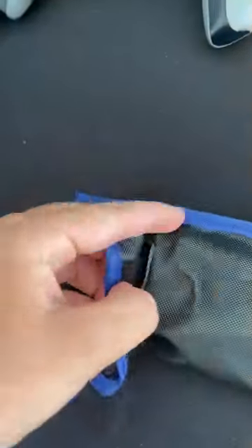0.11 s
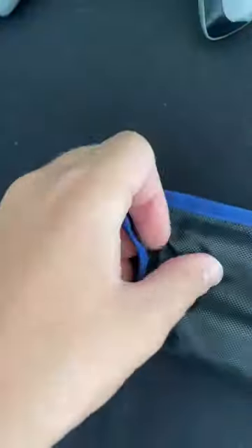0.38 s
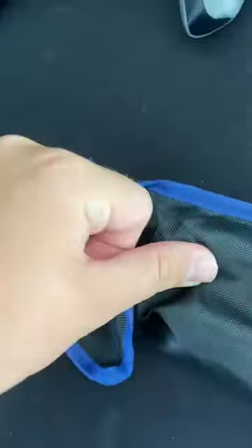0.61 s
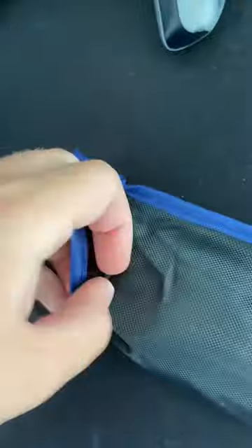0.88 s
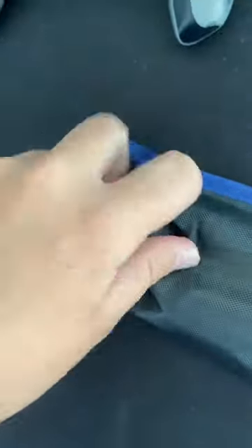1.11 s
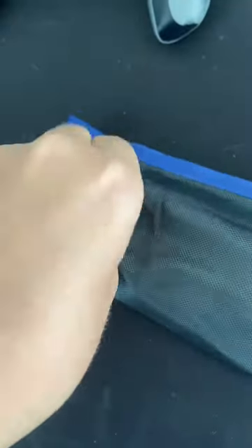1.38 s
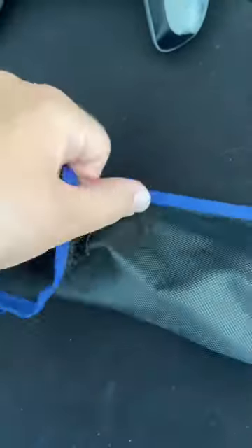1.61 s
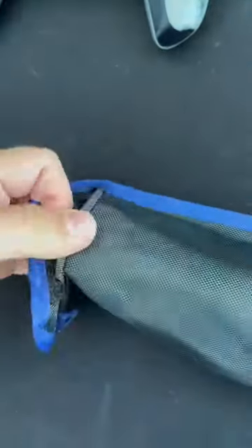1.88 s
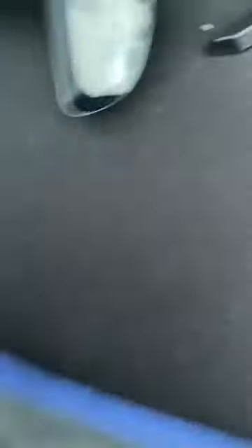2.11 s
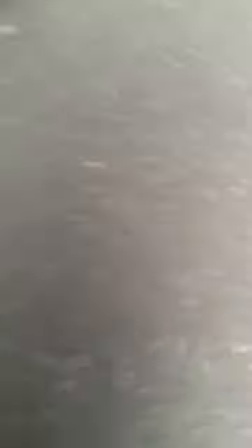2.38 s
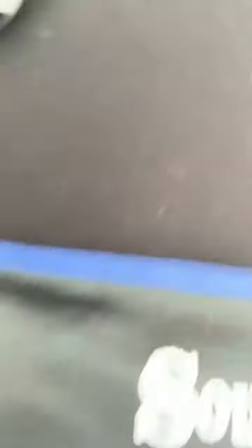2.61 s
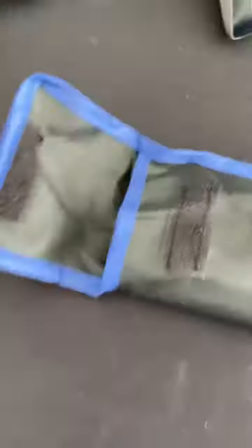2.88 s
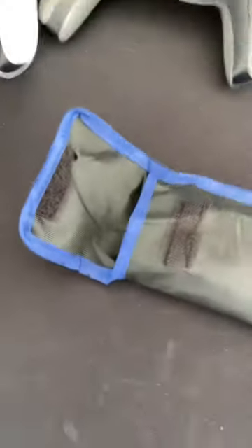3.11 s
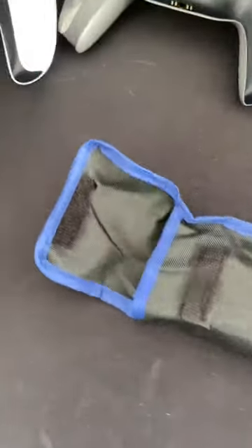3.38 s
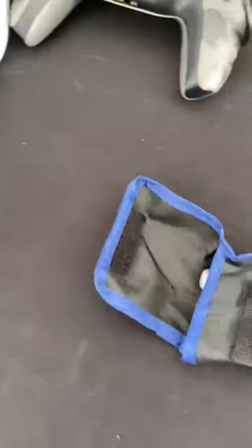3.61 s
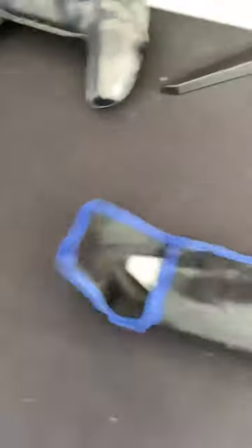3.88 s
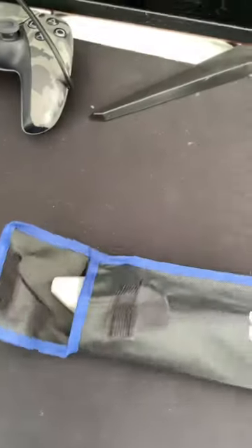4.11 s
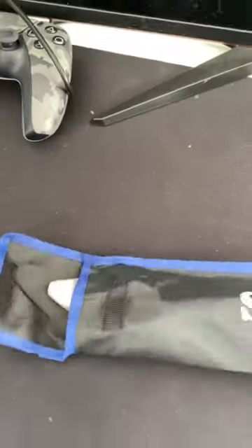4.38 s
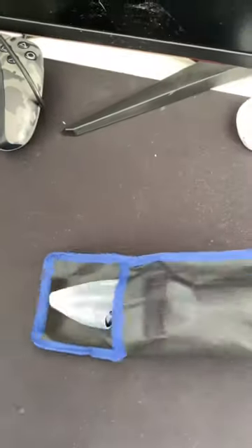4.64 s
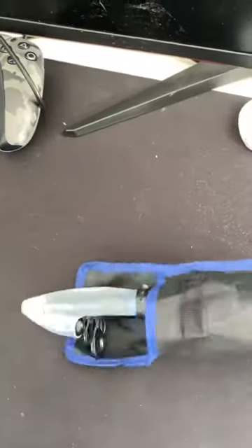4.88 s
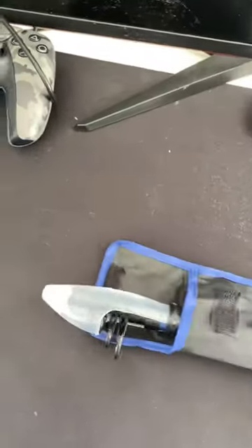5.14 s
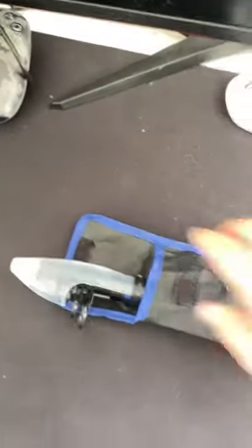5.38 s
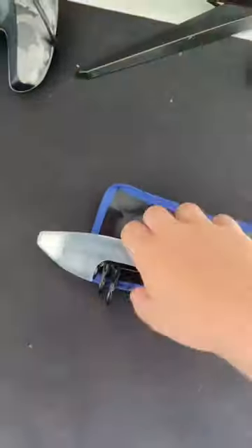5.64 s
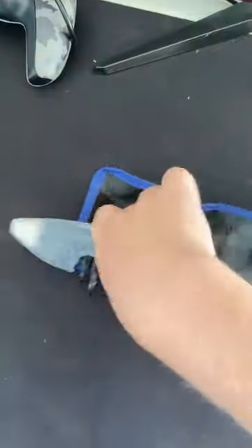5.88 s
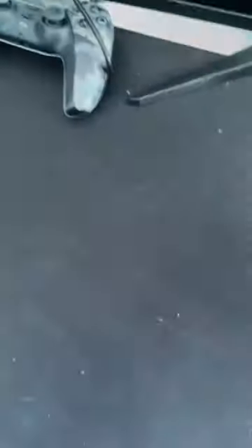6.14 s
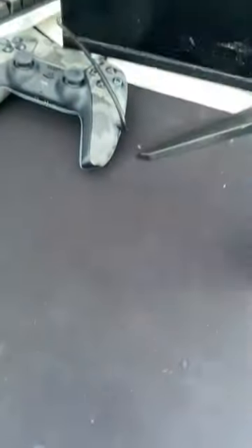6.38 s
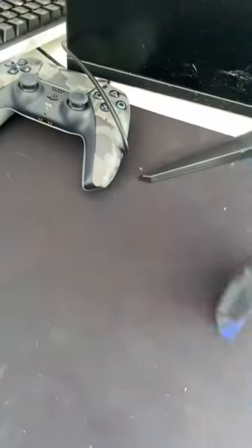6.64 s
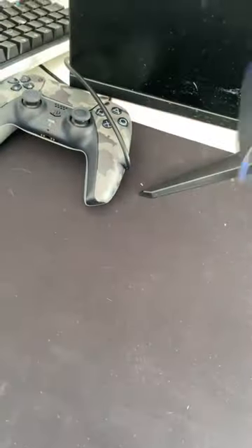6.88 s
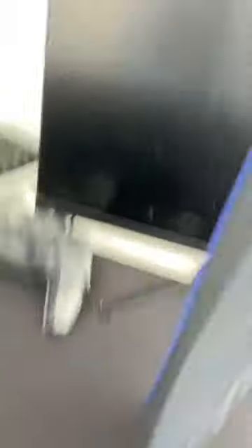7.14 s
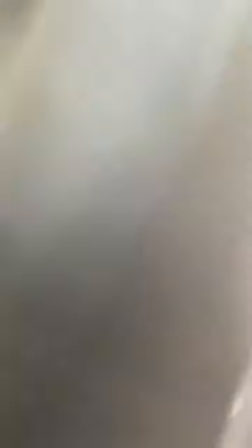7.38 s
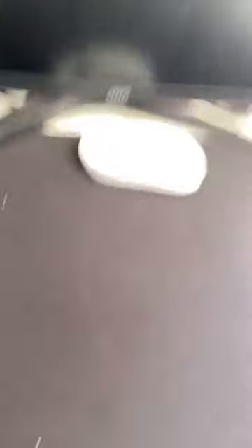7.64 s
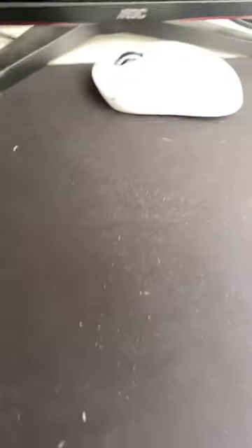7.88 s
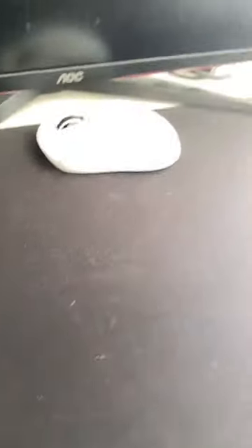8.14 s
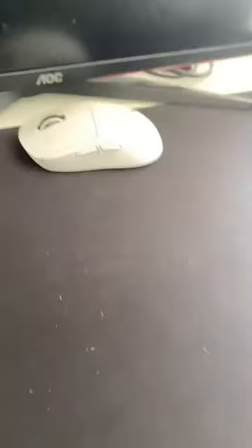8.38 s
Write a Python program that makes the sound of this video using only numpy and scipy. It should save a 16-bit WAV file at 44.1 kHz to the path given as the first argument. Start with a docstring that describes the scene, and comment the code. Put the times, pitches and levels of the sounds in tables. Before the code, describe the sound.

A stiff nylon bag with hook tape is fumbled open on a desk, rustling, crackling and snapping, then a rod rattles inside and it scrapes away.

```python
"""A nylon rod bag is opened and pushed about on a desk mat, close to a hand-held phone in a quiet room.
Cloth rubs and swishes in short strokes: clicks of catching threads ring air pockets and hiss over the weave.
Hook tape and creases tick as short cracks of noise; the rod rattles as bursts of contact that ring it.
Bumps and landings ring the modes of the desk top; still air, a fan's hum and a thin whine lie behind.
The two microphone ports hear part of the sound unlike, and the treble a little apart in time."""
import sys
import numpy as np
from scipy import signal
from scipy.fft import rfft, irfft, next_fast_len
from scipy.io import wavfile
from scipy.ndimage import uniform_filter1d

SR = 44100
rng = np.random.default_rng(int(sys.argv[2]) if len(sys.argv) > 2 else 0)


def voltage_ratio(level):
    """Linear amplitude factor for a level in decibels (scalar or array-like)."""
    return 10 ** (np.asarray(level, float) / 20)


def wav_record(signal):
    """Record a signal, one row per channel, as 16-bit PCM in the file named by sys.argv[1]."""
    frames = np.transpose(np.atleast_2d(signal))
    bounded = np.clip(frames, -1, 1)
    # unit amplitude maps onto the largest positive 16-bit level
    quanta = np.round(bounded * 32767).astype(np.int16)
    wavfile.write(sys.argv[1], SR, quanta)


N = 375054
LONG = next_fast_len(N, True)
TIME, HZ = np.arange(N) / SR, np.fft.rfftfreq(LONG, 1 / SR)

# All levels are those of the source, before the two ports blend it.
# The bag has three stages: flap shut, lying open from OPEN_S, lifted away from LIFT_S.
OPEN_S, LIFT_S = 2.6, 7.95

# strokes of cloth on cloth or mat:
# (start [s], length [s], rubbing level [dB], swish of the weave over the rubbing [dB])
STROKES = [(0.057, 0.018, -39, -6), (0.348, 0.0033, -36.5, -6), (0.403, 0.023, -41.5, 1),
           (0.434, 0.0056, -32.5, -8.5), (0.661, 0.059, -44.5, -2.5), (0.883, 0.019, -44.5, -6.5),
           (1.016, 0.022, -49, 0), (1.086, 0.046, -45, -24), (1.421, 0.0225, -44.5, -5),
           (1.507, 0.016, -33, -4.5), (1.552, 0.058, -29, -10), (1.886, 0.011, -54, -15),
           (1.967, 0.02, -43.5, -2), (2, 0.019, -31, 1), (2.056, 0.034, -45.5, 5.5),
           (2.136, 0.016, -28, -0.5), (2.219, 0.082, -39, -7), (2.303, 0.029, -24, -4.5),
           (3.263, 0.081, -45, -7.5), (3.661, 0.099, -44, -1), (3.991, 0.025, -31.5, -20),
           (4.425, 0.047, -47.5, 7), (4.54, 0.045, -46.5, 4), (4.64, 0.046, -44.5, -1.5),
           (4.731, 0.11, -43.5, 0), (4.901, 0.012, -53.5, -4), (5.082, 0.05, -52, -8),
           (5.442, 0.1, -52.5, -2.5), (6.292, 0.019, -43, -12.5), (6.344, 0.007, -42.5, -7.5),
           (6.373, 0.037, -47, -2), (6.469, 0.03, -45.5, -20), (6.557, 0.05, -35.5, -3),
           (6.651, 0.016, -47.5, 1.5), (6.876, 0.099, -43.5, -6), (7.349, 0.045, -38.5, -9),
           (7.456, 0.15, -33.5, -9), (7.623, 0.1, -26.5, -6.5), (7.744, 0.13, -31, 0),
           (8.045, 0.15, -33, -2.5), (8.305, 0.068, -29.5, 6.5), (8.404, 0.054, -36.5, 3.5)]
# spells in which a hand rests on the bag and fidgets:
# (start [s], end [s], rubbing level [dB], swish over the rubbing [dB])
HANDLING = [(0, 2.468, -54.5, -1.5), (3.2, 4.05, -60.5, 3.5), (4.248, 4.95, -57.5, -6),
            (5.694, 6.26, -60, 5.5), (6.27, 7.0, -54, -9.5), (7.57, 8.2, -36.5, -12.5)]
# pockets of air in the bag:
# (frequency [Hz], width of one resonance pass [Hz], level shut [dB], level open [dB], level lifted [dB])
POCKETS = [(1163, 1000, -2, -16.5, -10.5), (1950, 1540, -29, -6, -8), (2500, 1000, -4.5, -15, -3.5)]
# colour of the weave's hiss: (frequency [Hz], level [dB])
WEAVE = [(700, -4), (3500, -5), (5300, -0.5), (7500, -4.5), (11000, -9.5), (15700, -15.5), (16300, -43.5)]
# extra top of the weave, one per stage: level [dB]
SHEEN_DB = [0.5, -17, -1]
# how fast a stroke sets in, one per stage, before long strokes are eased: time constant [s]
RISE_S = [0.0018, 0.0026, 0.013]
# how a stroke weakens while it lasts, one per stage, negative where it grows: fall [dB/s]
SAG_DB_PER_S = [-4.5, 73.5, -6.5]
# the loaded bag bumping along the desk top: (start [s], length [s], level [dB])
DRAGS = [(1.531, 0.063, -38.5), (2.226, 0.12, -34.5), (3.856, 0.15, -35), (5.169, 0.04, -39.5),
         (6.551, 0.12, -44.5), (7.36, 0.031, -25), (7.457, 0.048, -20.5), (7.557, 0.13, -26.5),
         (7.755, 0.018, -29), (8.407, 0.059, -27.5)]
# colour of the desk top shaken by a drag: (frequency [Hz], level [dB])
THUD = [(30, -4), (120, 4), (260, -2), (520, -13), (850, -42)]
# hooks letting go, creases snapping: (time [s], peak level [dB], ring frequency [Hz])
TICKS = [(0.227, -22.5, 4140), (0.422, -16.5, 4370), (0.48, -6.5, 4740), (0.521, -5.5, 5060),
         (1.245, -21.5, 4340), (1.422, -22.5, 3620), (1.482, -14, 2717), (1.541, -20, 2937),
         (1.588, -15.5, 2250), (1.656, -17, 1464), (1.781, -23, 5400), (2.0, -12.5, 4740),
         (2.07, -8.5, 4200), (2.143, -15, 2544), (2.258, -13.5, 4010), (2.297, -7.5, 3450),
         (3.841, -7, 2930), (7.57, -2.5, 950), (8.357, -16, 2850)]
# the rod landing inside the bag: (time [s], thud peak level [dB], rattle peak level [dB])
DROPS = [(3.845, -6.5, -7.5), (3.925, -10.5, -8), (3.971, -22.5, -18), (5.145, -30.5, -22.5)]
# the rod tapping or scraping inside the bag: (time [s], peak level [dB], length [ms])
ROD_TAPS = [(4.32, -31.5, 1.9), (6.446, -31.5, 6.1), (6.561, -29, 4), (6.765, -33, 17), (6.869, -31.5, 14)]
# what the rod and its hard cap ring with: (frequency [Hz], width [Hz], level [dB])
ROD_RINGS = [(1430, 200, -1), (1750, 270, -1), (1937, 170, 4.5), (3100, 510, -8)]
# hand or phone bumping the desk: (time [s], peak level [dB], contact [ms])
KNOCKS = [(2.69, -5.5, 4), (2.749, -25.5, 2.8), (2.804, -29.5, 0.54), (2.856, -29, 2.6),
          (4.003, -20.5, 4.5), (4.805, -29, 0.45), (7.023, -18, 2), (7.081, -16.5, 2.4), (7.574, -11, 2.1),
          (7.619, -13, 0.65), (7.63, -12.5, 1.4), (7.654, -8.5, 0.62), (7.67, -11.5, 0.77),
          (7.693, -12.5, 0.6), (8.157, -21.5, 0.61), (8.267, -22, 0.43), (8.363, -16, 0.37)]
# modes of the desk top, about which each blow scatters: (frequency [Hz], level [dB], 60 dB decay [s])
DESK = [(104, -5.5, 0.075), (151, 0, 0.055), (223.3, 6, 0.02), (453, 1.5, 0.04), (565, 2.5, 0.041),
        (777, 3.5, 0.031)]
# colour of the still air: (frequency [Hz], level [dB])
ROOM = [(30, -4), (80, -23.5), (200, -11), (500, -8.5), (2000, -23.5), (3500, -30.5), (9000, -55)]
# the fan's hum lines, before the hum level: (frequency [Hz], width of one resonance pass [Hz], level [dB])
FAN = [(59, 47, -59.5), (116, 38, -54.5), (297.8, 37, -60.5), (796.4, 20, -71)]
# the hum and whine sink for a while and come back: (time [s], level [dB])
HUM_LEVEL = [(0, 1.5), (2.7, 3), (3.2, -10), (4.4, -0.5), (8.5, 6.5)]
# how far the left port leads the right: (frequency [Hz], phase [turns])
LEAD = [(4600, 0), (10300, 1), (16700, 2)]
# the part that differs between the ports: (frequency [Hz], level [dB])
UNLIKE = [(80, -19), (700, -2.5), (1900, -3), (4500, -2), (7000, -15.5)]


def level(x, db):
    """Scale to an rms level."""
    return x * voltage_ratio(db) / np.sqrt(np.mean(x ** 2))


def shape(points):
    """Gain of (Hz, dB) points at every bin, joined on a log axis."""
    hz, db = np.transpose(points)
    return voltage_ratio(np.interp(np.log(HZ + 1), np.log(hz), db))


def peak(hz, width):
    """Response of one resonance, gain 1 at its centre."""
    return 1j * HZ * width / (hz ** 2 - HZ ** 2 + 1j * HZ * width)


def through(x, response):
    """Filter by a frequency response."""
    return irfft(rfft(x, LONG) * response, LONG)[..., :N]


def walk(rate):
    """Random levels held 1 / rate s and slewed twice; spread 1."""
    k = int(SR / rate)
    held = np.repeat(rng.standard_normal(N // k + 1), k)
    path = uniform_filter1d(uniform_filter1d(held, k), k)[:N]
    return path / path.std()


def swells(start, length, db, rise_s, fall_s, ease_per_s=14.7, sag_db_per_s=0):
    """Gain of movements that set in, hold and trail off, long ones more gently; their powers add."""
    coarse_time = TIME[::64]
    t = coarse_time[:, None] - start
    ease = 1 + ease_per_s * np.minimum(length, .15)
    db = db - sag_db_per_s * np.clip(t, 0, length)
    flank = np.maximum(-t / rise_s, 0) + np.maximum((t - length) / fall_s, 0)
    power = (voltage_ratio(db) ** 2 * np.exp(-2 * flank / ease)).sum(axis=1)
    return np.interp(TIME, coarse_time, np.sqrt(power))


def threads(per_s, spread_db, tail_s):
    """Threads catching and slipping: uneven clicks, each a puff of noise; a like and an unlike part."""
    catch = (rng.random(N) < per_s / SR) * voltage_ratio(spread_db * rng.exponential(size=N))
    puffs = signal.lfilter([1], [1, -np.exp(-1 / (tail_s * SR))], catch)
    return level(puffs * rng.standard_normal((2, N)), 0)


def rubbing():
    """Coarse slips ring the bag's pockets, fine slips hiss over the weave; hook tape crackles until it parts."""
    # the cloth also rustles round each rattle of a landing rod
    shakes = [(s - 0.0092, 0.033, rattle_db - 21.5, -13) for s, _, rattle_db in DROPS]
    start, length, rub_db, swish_db = np.transpose(STROKES + shakes)
    stroke_stage = np.searchsorted([OPEN_S, LIFT_S], start)
    rise_s, sag = np.take(RISE_S, stroke_stage), np.take(SAG_DB_PER_S, stroke_stage)
    strokes = swells(start, length, rub_db, rise_s, 0.0098, sag_db_per_s=sag)
    stroke_swish = swells(start, length, rub_db + swish_db, rise_s, 0.0085, sag_db_per_s=sag)

    begin, end, rest_db, rest_swish_db = np.transpose(HANDLING)
    fidget = voltage_ratio(3 * walk(16))
    rest, rest_swish = (fidget * swells(begin, end - begin, db, 0.0072, 0.045, ease_per_s=0)
                        for db in (rest_db, rest_db + rest_swish_db))

    stage = np.searchsorted([OPEN_S, LIFT_S], TIME)
    pockets = 0
    for hz, width, *stage_db in POCKETS:
        ring = level(through(threads(2000, 2.2, 0.0003), peak(hz, width) ** 2), 0)
        pockets = pockets + voltage_ratio(np.take(stage_db, stage) + 2.16 * walk(14)) * ring

    weave = level(through(threads(3600, 0.96, 0.0021), shape(WEAVE)), 0)
    weave = weave + voltage_ratio(np.take(SHEEN_DB, stage)) * np.diff(weave, prepend=0)
    hooks = (stage == 0) * through(threads(80, 3, .0006), shape(WEAVE))

    coarse = np.hypot(strokes, rest) * pockets
    fine = np.hypot(stroke_swish, rest_swish) * (weave + level(hooks, -5))
    jerks = voltage_ratio(1.7 * walk(90))  # unevenness of the slip
    return jerks * (coarse + fine)


def dragging():
    """The sliding weight judders and shakes the desk top, unevenly at the two ports."""
    start, length, db = np.transpose(DRAGS)
    shaking = level(through(threads(600, 1.3, .004), shape(THUD)), 0)
    moves = swells(start, length, db, 0.01, 0.013, ease_per_s=2.2)
    return moves * shaking * [[1], [voltage_ratio(5.5)]]  # the unlike part is the stronger


def ticks():
    """Each tick is a millisecond crack that rings the cloth and its upper pocket, with a weak rustle after."""
    out, t = np.zeros(N + 2048), np.arange(2048) / SR
    # the dry crack on top of a bump: -12 dB at 1 ms contact; softer ones crack less
    bumps = [(s, db - 12 - 20 * np.log10(contact_ms), 830) for s, db, contact_ms in KNOCKS]
    rows = TICKS + bumps
    envelope = np.minimum(t / .0009, 1) * (np.exp(-t / .0011) + voltage_ratio(-20) * np.exp(-t / .007))
    upper_pocket = signal.iirpeak(POCKETS[-1][0], 4.0, SR)
    for (s, db, hz), noise in zip(rows, rng.standard_normal((len(rows), 2048))):
        crack = noise * envelope
        cloth = signal.iirpeak(hz, 1.3, SR)
        tick = signal.lfilter(*cloth, signal.lfilter(*cloth, crack))
        tick = tick + voltage_ratio(-14.5) * signal.lfilter(*upper_pocket, crack)
        tick = tick + voltage_ratio(-9) * crack * min(hz / 3000, 1) ** 2  # small creases keep more of the bare snap
        out[int(s * SR):][:2048] += voltage_ratio(db) * tick / np.abs(tick).max()
    return out[:N]


def rod():
    """A burst of hard little contacts rings the rod and its cap, with a faint broad click."""
    out, t = np.zeros(N + 4096), np.arange(4096) / SR
    rows = ROD_TAPS + [(s, rattle_db, 6.1) for s, _, rattle_db in DROPS]  # a landing rattles for 6.1 ms
    for (s, db, length_ms), noise in zip(rows, rng.standard_normal((len(rows), 4096))):
        fade = np.exp(-np.maximum(1000 * t - length_ms, 0) / (1 + length_ms / 4))
        burst = noise * np.minimum(t / .0005, 1) * fade
        ring = voltage_ratio(-22) * uniform_filter1d(burst, size=4)  # the broad click
        for hz, width, ring_db in ROD_RINGS:
            ring = ring + voltage_ratio(ring_db) * signal.lfilter(*signal.iirpeak(hz, hz / width, SR), burst)
        out[int(s * SR):][:4096] += voltage_ratio(db) * ring / np.abs(ring).max()
    return out[:N]


def knocks():
    """A soft push rings the modes of the desk top; the low ones arrive late, and a long contact leaves only them."""
    out, t = np.zeros(N + 8192), np.arange(8192) / SR
    # a landing rod thuds 3.4 ms after its rattle, with 3.14 ms of contact
    rows = KNOCKS + [(s + 0.0034, thud_db, 3.14) for s, thud_db, _ in DROPS]
    # slow bending waves: each mode lags the last one listed by 0.3 of the difference in their periods
    late = [t - 0.3 * (1 / hz - 1 / DESK[-1][0]) for hz, _, _ in DESK]
    for (s, db, contact_ms), scatter in zip(rows, rng.standard_normal((len(rows), len(DESK)))):
        modes = 0
        for (hz, mode_db, t60), off, u in zip(DESK, scatter, late):
            decay = (u >= 0) * np.exp(-np.log(1000) * u / t60)
            modes = modes + voltage_ratio(mode_db) * decay * np.cos(2 * np.pi * hz * (1 + 0.08 * off) * u)
        push = np.sin(np.pi * np.minimum(1000 * t / max(contact_ms, .1), 1)) ** 2
        blow = np.convolve(modes, push[:1024])[:8192]
        out[int(s * SR):][:8192] -= voltage_ratio(db) * blow / np.abs(blow).max()
    return out[:N]


def room():
    """Still air as shaped noise, the fan's wavering hum as narrow bands of noise, and a thin steady whine."""
    air = level(through(rng.standard_normal((2, N)), shape(ROOM)), -59)
    # the root makes each narrow band of noise as strong as its listed level
    lines = sum(voltage_ratio(db) * peak(hz, width) ** 2 * np.sqrt(SR / np.pi / width * 2) for hz, width, db in FAN)
    hum = through(rng.standard_normal((2, N)), lines)
    whine = voltage_ratio(-60 + 0.99 * walk(7.9)) * np.sin(2 * np.pi * 398.3 * TIME + 0.29 * walk(2.1))
    return air + voltage_ratio(np.interp(TIME, *np.transpose(HUM_LEVEL))) * (hum + whine)


def scene():
    """All sources at two ports: part of the sound is unlike at each, and the treble reaches the left one first."""
    like, unlike = rfft(rubbing() + dragging() + room(), LONG)
    hits = rfft(ticks() + rod() + knocks(), LONG)
    mid = like + hits
    # a hit arrives out of step at the two ports rather than as another sound
    side = (unlike + 1j * hits) * shape(UNLIKE)
    lead = np.exp(1j * np.pi * np.interp(HZ, *np.transpose(LEAD)))  # half the lead on each port
    left = (mid + side) * lead * voltage_ratio(-0.87)  # the left port is a little weaker
    right = (mid - side) / lead
    return irfft([left, right], LONG)[:, :N]


def top_cut(x):
    """Nothing passes above the cut-off."""
    return signal.sosfilt(signal.butter(12, 16990, fs=SR, output="sos"), x)


def record(dry):
    """The phone's microphones drop the deepest bass, below 45 Hz."""
    mix = signal.sosfilt(signal.butter(2, 45, "high", fs=SR, output="sos"), dry)
    return top_cut(mix)


dry = scene()
out = record(dry)
wav_record(out)
```